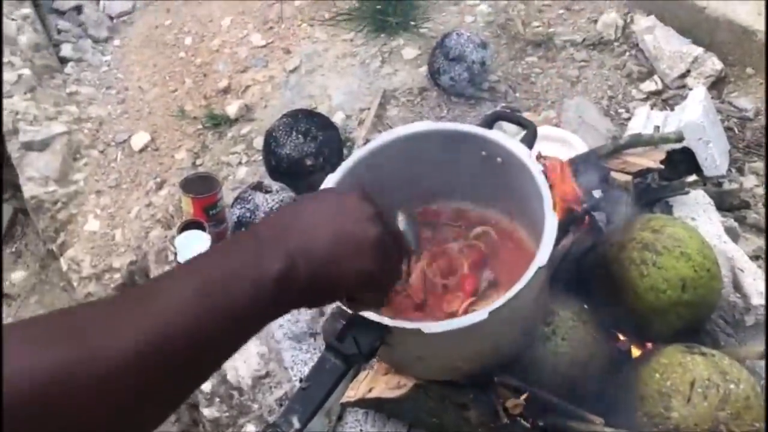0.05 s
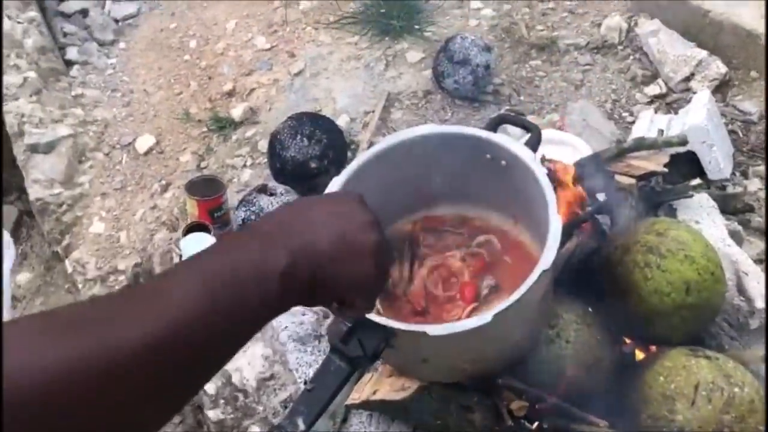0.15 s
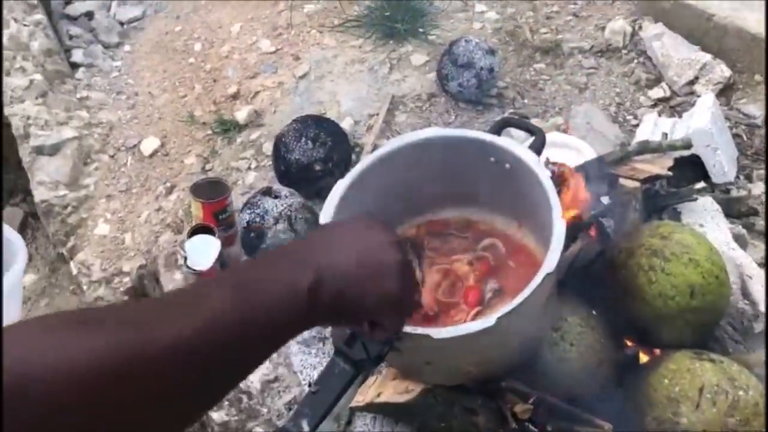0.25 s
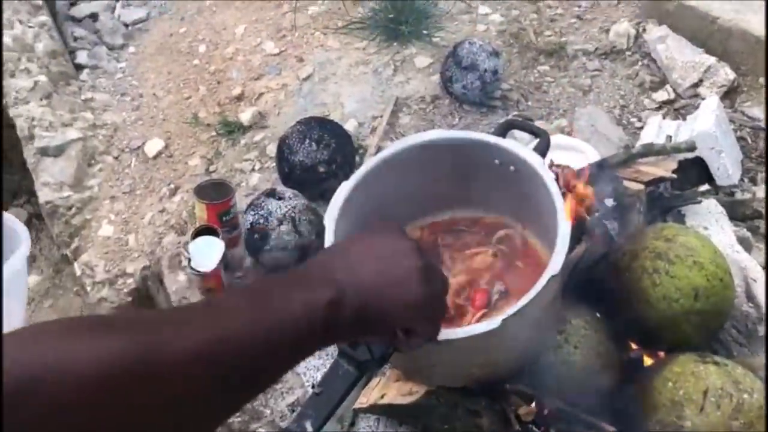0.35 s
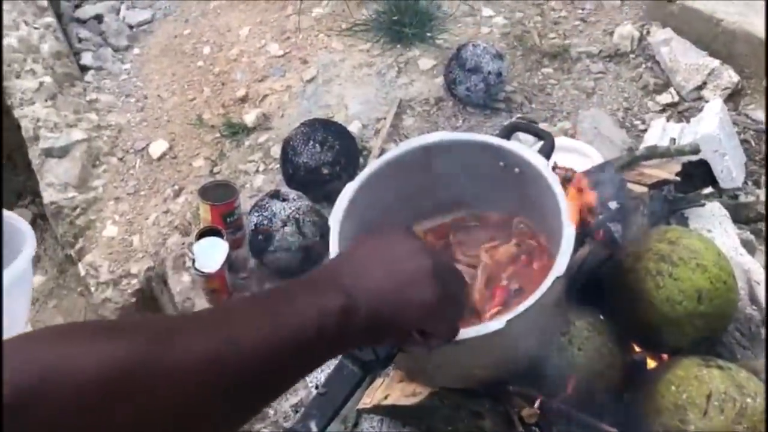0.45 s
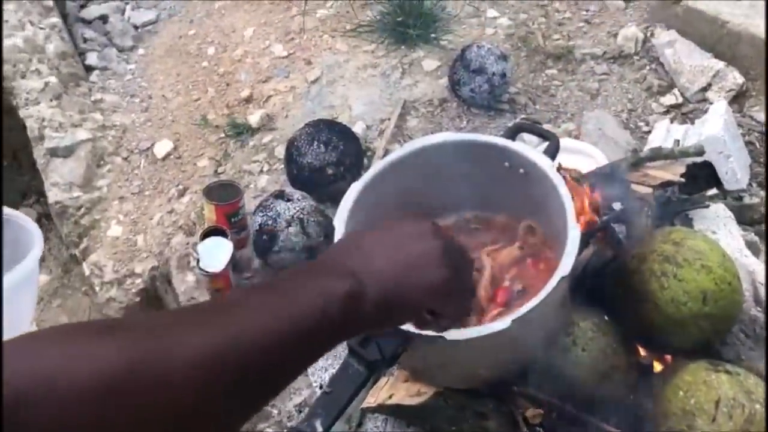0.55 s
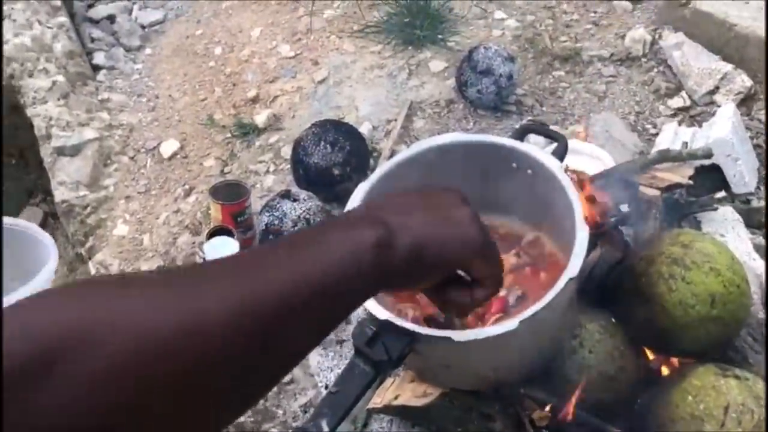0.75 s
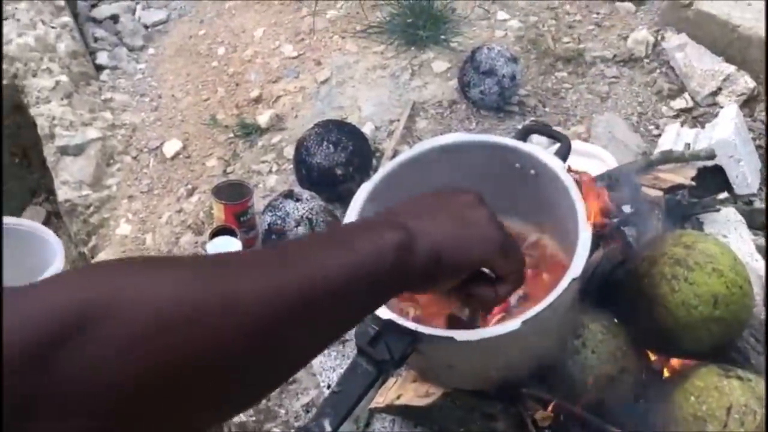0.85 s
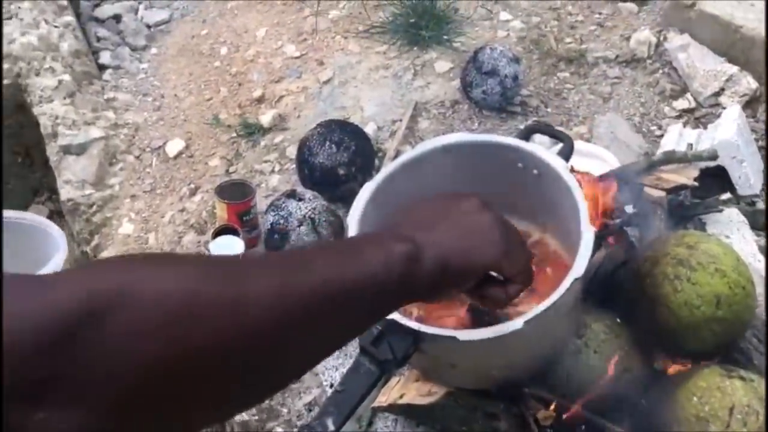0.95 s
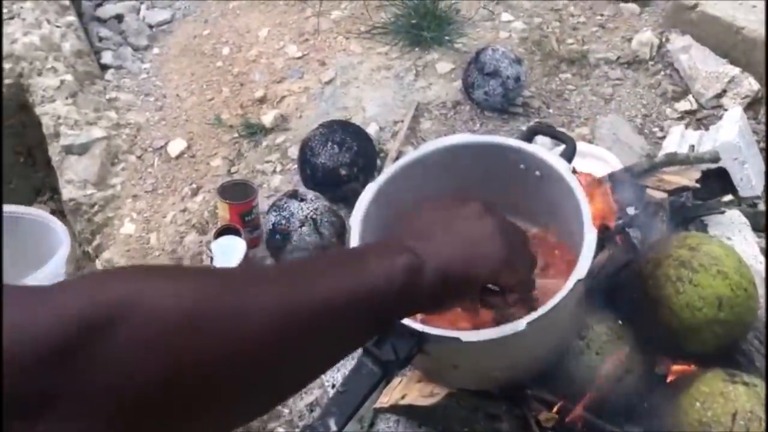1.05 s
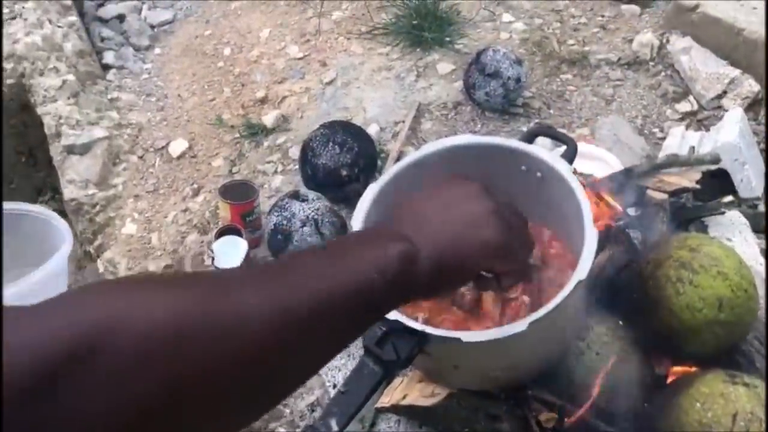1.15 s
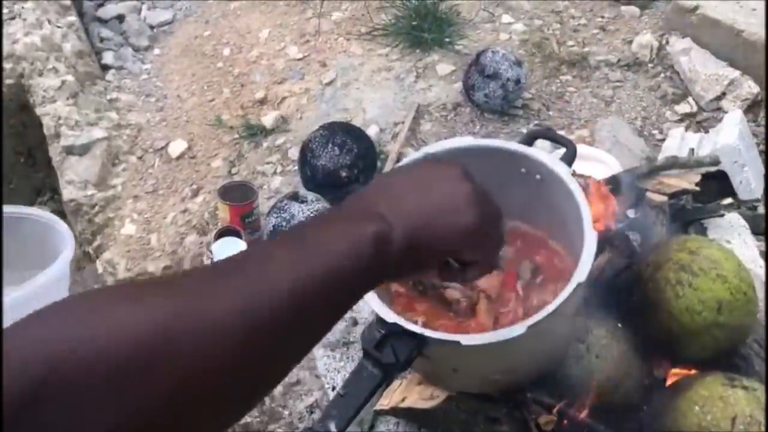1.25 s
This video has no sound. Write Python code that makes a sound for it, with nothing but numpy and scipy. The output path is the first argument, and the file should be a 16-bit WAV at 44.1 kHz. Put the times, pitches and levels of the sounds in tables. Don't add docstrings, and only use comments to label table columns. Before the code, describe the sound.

Stew hisses and spits steadily in a metal pot, faint hum and soft fire rumble beneath. One bright spoon click comes early, then a short scrape and a duller knock. Close microphone in open air, top end cut off.

```python
import sys
import numpy as np
from scipy import signal
from scipy.io import wavfile
from scipy.ndimage import uniform_filter1d

SR = 44100
rng = np.random.default_rng(int(sys.argv[2]) if len(sys.argv) > 2 else 0)


def linear_from_db(decibels):
    return 10 ** (np.asarray(decibels, float) / 20)


def transcribe(signal):
    frames = np.atleast_2d(signal).T
    limited = np.clip(frames, -1, 1)
    pcm = np.round(limited * 32767).astype(np.int16)
    wavfile.write(sys.argv[1], SR, pcm)


N = 57330

# start_s [s], pot_hum_db [dB], flame_db [dB]
FIRE_DRAUGHT = [(0, -51.5, -54), (.13, -59, -66), (.28, -50.5, -53), (.4, -56.5, -62), (.58, -56, -54),
                (.68, -51.5, -56), (.77, -51, -67), (.85, -52, -64), (.95, -53.5, -71), (1.05, -48, -67),
                (1.15, -54.5, -69), (1.22, -54.5, -64), (1.3, -53, -72)]


def rms_one(x):
    return x / np.sqrt(np.mean(x ** 2) + 1e-20)


def at_hz(points, hz):
    corner_hz, level_db = np.array(points)[:, 0], np.array(points)[:, 1]
    return np.interp(np.log(hz), np.log(corner_hz), level_db)


def in_time(rows):
    s, *columns = np.transpose(rows)
    return [np.interp(np.arange(N) / SR, s, column) for column in columns]


def high_pass(x, hz):
    return signal.sosfilt(signal.butter(4, hz, "high", fs=SR, output="sos"), x)


def drift(rate_hz):
    step = 40
    r = np.exp(-2 * np.pi * step * rate_hz / SR)
    chance = rng.standard_normal(N // step + 2002)
    slow = rms_one(signal.lfilter([1], [1, -2 * r, r * r], chance)[2000:])
    return np.interp(np.arange(N) / step, np.arange(len(slow)), slow)


def ring(clicks, hz, t60):
    r, w = linear_from_db(-60 / (t60 * SR)), 2 * np.pi * hz / SR
    return signal.lfilter([0, np.sin(w)], [1, -2 * r * np.cos(w), r * r], clicks + 1e-18)


def t60_of(width_hz):
    return np.log(1000) / np.pi / width_hz


def grains(per_s):
    size_db = 1.9 * np.minimum(rng.exponential(1, N), 4.5)
    sizes = linear_from_db(size_db) * rng.choice([-1, 1], N)
    return sizes * (rng.random(N) < per_s * linear_from_db(3 * drift(25)) / SR)


def bands(spectrum, patchy_db, extra_db):
    low_hz, high_hz = spectrum[0][0], min(spectrum[-1][0], 13000)
    edges = low_hz * 2 ** np.arange(0, np.log2(high_hz / low_hz) + .34, 1 / 3)
    out, together, white = 0, drift(19.0), rng.standard_normal((2, N))
    for k, (low, high) in enumerate(zip(edges, edges[1:])):
        hz = np.sqrt(low * high)
        band_pass = signal.butter(2, [low, high], "band", fs=SR, output="sos")
        band = signal.sosfilt(band_pass, white[k % 2])
        flicker_db = patchy_db * (.5 * together + drift(15.0))
        out = out + band * linear_from_db(at_hz(spectrum, hz) + extra_db(hz) + flicker_db)
    return rms_one(out)


def frying():
    # start_s [s], level_db [dB]
    vigour = [(0, -45), (.07, -44), (.13, -41.5), (.19, -43.5), (.3, -41.5), (.36, -42.5), (.45, -42.5),
              (.5, -47), (.54, -48.5), (.62, -44.5), (.72, -41.5), (.81, -42), (.86, -42), (1.0, -44.5),
              (1.1, -45), (1.14, -47), (1.22, -44), (1.3, -42.5)]
    # pitch_hz [Hz], level_db [dB per Hz]
    colour = [(350, -47), (600, -42), (1000, -10.5), (1100, -21), (1620, -8.5), (1850, -16.5), (2150, -7),
              (5450, -5.5), (12000, -6.5), (15600, -62), (22000, -120)]
    # start_s [s], pitch_hz [Hz]
    brightest = [(0, 4860), (.12, 3840), (.26, 3730), (.33, 8700), (.45, 6400), (.7, 7700), (.9, 4350),
                 (1.1, 4660), (1.3, 6300)]
    spits_per_s, spit_cycles, spit_db, hiss_db = 2500, 14, -3, 1.5
    focus_octaves, focus_db = 0.36, 2
    centre_hz = in_time(brightest)[0]

    def focus(hz):
        return focus_db * np.exp(-.5 * (np.log2(hz / centre_hz) / focus_octaves) ** 2)

    born = grains(spits_per_s)
    pitches = np.geomspace(2200, 11500, num=28)
    dealt = rng.integers(0, 28, size=N)
    spits = 0
    for k, hz in enumerate(pitches):
        burst = ring(born * (dealt == k), hz, spit_cycles / hz)
        spits = spits + linear_from_db(at_hz(colour, hz) + focus(hz)) * hz * burst
    hiss = bands(colour, 2.1, focus)
    return linear_from_db(in_time(vigour)[0]) * (linear_from_db(spit_db) * rms_one(spits) + linear_from_db(hiss_db) * hiss)


def pops():
    # start_s [s], peak_db [dB], pitch_hz [Hz]
    large_spits = [(.031, -21, 4750), (.1125, -28, 4830), (.291, -22.5, 3250), (0.354, -20, 7200),
                   (0.4234, -24.5, 5250), (0.503, -41, 6800), (0.548, -24, 6300), (0.5564, -20.5, 6450),
                   (0.559, -25.5, 8500), (.5963, -17.5, 7500), (.609, -25, 5200), (1.232, -46, 7500),
                   (0.0176, -25, 4400), (0.085, -30, 4840), (0.2, -32, 3800)]
    cycles, crack_db = 14.3, -29
    out = np.zeros(N)
    for s, db, hz in large_spits:
        click = linear_from_db(db) * (np.arange(N) == int(s * SR))
        out += ring(click, hz, cycles / hz)
        out += linear_from_db(crack_db) * ring(click, hz * 1.1, 0.44 * cycles / hz)
    return high_pass(out, 4000)


def pot_hum():
    # pitch_hz [Hz], width_hz [Hz], level_db [dB], share that follows the wall [0-1]
    resonances = [(482, 41, -5, 0), (1012, 30, -5.5, 1), (1605, 160, -6, .3), (2098, 116, -8.5, 0),
                  (420, 30, -10, 0)]
    # start_s [s], level_db [dB]
    wall_free = [(0, 7), (.075, -33), (.115, -9), (.15, 1), (.38, -1.5), (.43, -2), (.47, 2), (.53, 8),
                 (.57, 6), (.68, -11), (.8, 2), (.92, 2), (1.04, -3.5), (1.16, 1), (1.22, 2.5), (1.26, 9),
                 (1.3, -10)]
    free_db, hum = in_time(wall_free)[0], 0
    for hz, width_hz, db, share in resonances:
        tone = rms_one(ring(rng.standard_normal(N), hz, t60_of(width_hz)))
        hum = hum + linear_from_db(db + share * free_db + 2 * drift(4.1)) * tone
    return linear_from_db(in_time(FIRE_DRAUGHT)[0]) * hum


def drag():
    # start_s [s], level_db [dB]
    pressure = [(.55, -54), (.62, -43), (.72, -37), (.79, -44), (.86, -60)]
    # pitch_hz [Hz], width_hz [Hz], level_db [dB]
    sung_pitches = [(2223, 30, -6), (5240, 160, 3), (5570, 150, 1.5), (6300, 340, 0), (7360, 590, 1.5),
                    (9100, 700, 3), (10700, 640, 1.5)]
    rubs_per_s = 1100
    sung = 0
    for hz, width_hz, db in sung_pitches:
        sung = sung + linear_from_db(db) * rms_one(ring(grains(rubs_per_s), hz, t60_of(width_hz)))
    return linear_from_db(in_time(pressure)[0]) * rms_one(sung)


def strike(contacts, modes, crack_db, tail_db):
    contact_s, swell_cycles, rough = .00002, .8, .25
    bounce_dull_hz, bounce_low_db = 1570, -8
    crack_t60_s, tail_t60_s = 0.023, 0.05
    s, db = np.transpose(contacts)
    at, out, clicks = (s * SR).astype(int), 0, np.zeros(N)
    for k, (hz, level_db, t60) in enumerate(modes):
        hit = np.zeros(N)
        late = ((rng.random(len(s)) * contact_s + swell_cycles / hz) * SR).astype(int)
        light_db = bounce_low_db * (db < db.max()) / (1 + (hz / bounce_dull_hz) ** 2)
        uneven_db = 1.5 * rng.standard_normal(len(s))
        hit[at + late] = linear_from_db(db + light_db + level_db + uneven_db) * (-1) ** k
        out = out + ring(hit, hz, t60) * (1 + rough * drift(150))
    clicks[at] = linear_from_db(db)

    def dying(t60):
        return signal.lfilter([1], [1, -linear_from_db(-60 / (t60 * SR))], clicks + 1e-18)

    colour = [(hz, level_db) for hz, level_db, _ in modes] + [(11700, -10)]
    fading = linear_from_db(crack_db) * dying(crack_t60_s) + linear_from_db(tail_db) * dying(tail_t60_s)
    return out + bands(colour, 0.098, lambda hz: 0) * fading


def wall_click():
    # start_s [s], level_db [dB]
    touches = [
        (.2377, -44),
        (.2398, -11),
        (.24165, -12),
        (.2443, -26),
        (.2497, -31),
        (.2542, -32),
        (.2632, -40),
        (.2790, -42),
    ]
    # pitch_hz [Hz], level_db [dB], t60_s [s]
    wall_modes = [(812, -14.5, 0.014), (996, -16.5, 0.058), (1442, -21, 0.12), (2103, -20, 0.053),
                  (2708, -19, 0.035), (2900, -16, 0.11), (3350, -6, 0.03), (3510, 0, .022),
                  (4090, -4.5, 0.022), (4477, -15, .022), (4950, -1, 0.018), (6105, -9.5, 0.035),
                  (6800, 0.5, 0.01), (8400, 0, 0.006)]
    return high_pass(strike(touches, wall_modes, crack_db=-5, tail_db=-33), 600)


def bottom_knock():
    # start_s [s], level_db [dB]
    touches = [
        (.9835, -22.5),
        (.9848, -27),
        (.9935, -43),
        (.9975, -41),
        (1.0015, -39),
        (1.0085, -37),
        (1.013, -43),
    ]
    # pitch_hz [Hz], level_db [dB], t60_s [s]
    bottom_modes = [(218, -11.5, 0.041), (421, -5, 0.046), (506, -4, 0.041), (800, -8.5, 0.016),
                    (956, -8.5, 0.027), (1175, -7, 0.098), (1320, -6.5, 0.016), (1950, -0.5, 0.041),
                    (2555, -2.5, 0.018), (3400, -13.5, 0.023), (4220, -6, 0.011), (4800, -6, 0.015),
                    (6350, 0.5, 0.011), (8630, -11, 0.006)]
    return high_pass(strike(touches, bottom_modes, crack_db=-5, tail_db=-20), 170)


def fire():
    # pitch_hz [Hz], level_db [dB per Hz]
    fire_colour = [(15, -51), (25, -28), (81, 12.5), (119, 3.5), (189, 8), (320, -7), (458, 6), (687, -7.5),
                   (900, 7), (1170, -21), (1980, -120)]
    flame_db = in_time(FIRE_DRAUGHT)[1]
    swell_db = 0.69 * (flame_db - flame_db.mean())
    return linear_from_db(-58) * bands(fire_colour, 1, lambda hz: swell_db * (hz < 140))


def scene():
    sizzle = frying() + pops() + pot_hum()
    stirring = drag() + wall_click() + bottom_knock()
    return (sizzle + stirring + fire())[None]


def thin_gaps(x):
    # fade_from_s [s], empty_from_s [s], empty_until_s [s], back_s [s]
    gaps = [
        (.122, .142, .143, .163),
        (.293, .314, .316, .337),
        (.313, .330, .335, .346),
        (.421, .441, .442, .462),
        (.805, .825, .826, .846),
        (.933, .953, .962, .966),
    ]
    # pitch_hz [Hz], level_db [dB rms]
    tones_1 = [(3580, -49), (3806, -48), (4651, -47), (6713, -50.5), (7827, -64), (9631, -56)]
    # pitch_hz [Hz], level_db [dB rms]
    tones_2 = [(5405, -53), (6670, -49), (7273, -46)]
    # pitch_hz [Hz], level_db [dB rms]
    tones_3 = [(436.0, -53.5), (4958, -51), (6135, -49), (8096, -49), (8473, -50), (9049, -45), (9367, -48),
               (9948, -53)]
    # pitch_hz [Hz], level_db [dB rms]
    tones_4 = [(452.2, -51.5), (1001, -50.5), (4468, -51.5), (6062, -53), (6901, -46.5), (7133, -54),
               (7510, -54), (8140, -45), (9173, -49.5), (9868, -49)]
    # pitch_hz [Hz], level_db [dB rms]
    tones_5 = [(506.0, -53.5), (2099, -50.5), (4484, -50.5), (5082, -46.5), (5426, -64), (5943, -45),
               (7375, -51), (9135, -48), (9432, -55)]
    # pitch_hz [Hz], level_db [dB rms]
    tones_6 = [(995.9, -53), (2124, -54.5), (3246, -54), (3644, -55), (3854, -52), (4205, -47), (5520, -45),
               (8145, -48), (8635, -49), (10713, -49)]
    spared_hz, overlap, stagger_s = 10500, 1.05, .002
    t, gone, held = np.arange(N) / SR, 0, 0
    low = signal.sosfiltfilt(signal.butter(12, spared_hz, fs=SR, output="sos"), x)
    for times, kept in zip(gaps, [tones_1, tones_2, tones_3, tones_4, tones_5, tones_6]):
        turn = np.pi / 2 * np.interp(t, times, [0, 1, 1, 0])
        hz, db = np.transpose(kept)[:, :, None]
        waves = np.sin(2 * np.pi * (hz * t + rng.random(hz.shape)))
        tones = np.sqrt(2) * linear_from_db(db) * (db > -70) * waves
        fade = uniform_filter1d(np.sin(turn) ** 2, size=200)
        lags = stagger_s * rng.uniform(-1.7, 1, len(hz))
        swell = [np.interp(t - lag, t, fade) for lag in lags]
        held = held + (swell * tones).sum(axis=0)
        gone = np.minimum(gone + turn, np.pi / 2)
    return x + held - (1 - np.abs(np.cos(gone)) ** overlap) * low


def band_limit(x):
    return signal.sosfilt(signal.butter(12, 12690, fs=SR, output="sos"), x)


def record(dry):
    overload = 1.1
    x = overload * np.tanh(high_pass(dry[0], 45) / overload)
    x = thin_gaps(x)
    x = signal.sosfilt(signal.ellip(14, .5, 85, 11850, fs=SR, output="sos"), x)
    return band_limit(x[None])


dry = scene()
out = record(dry)
transcribe(out)
```